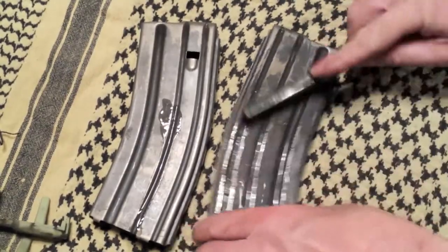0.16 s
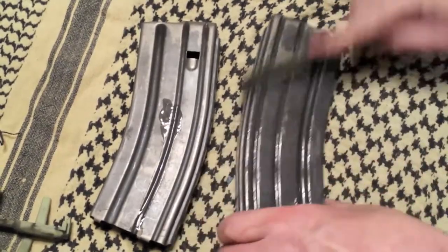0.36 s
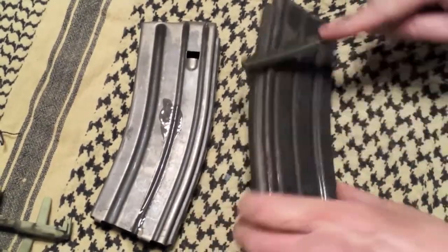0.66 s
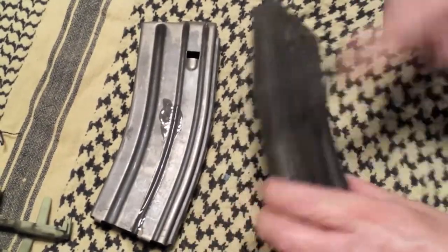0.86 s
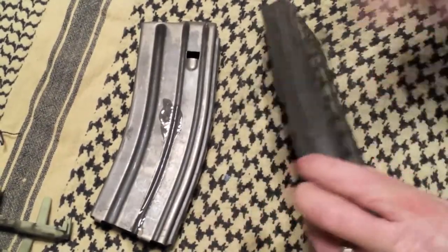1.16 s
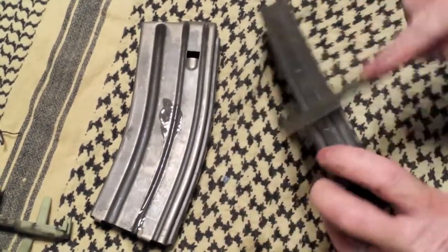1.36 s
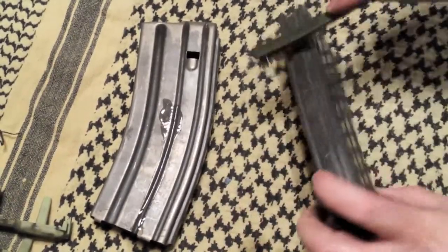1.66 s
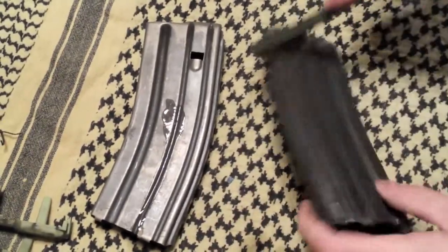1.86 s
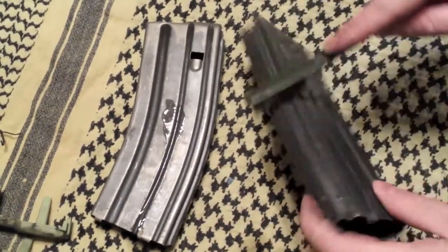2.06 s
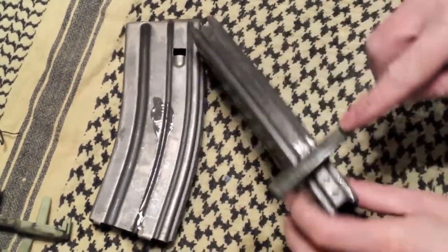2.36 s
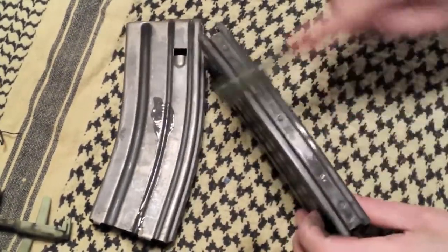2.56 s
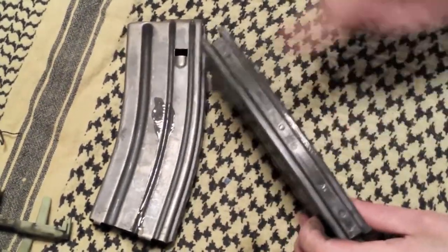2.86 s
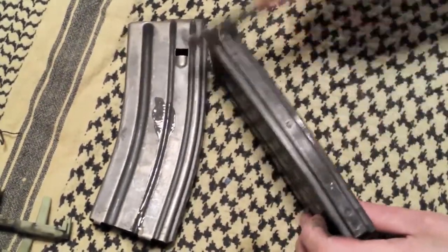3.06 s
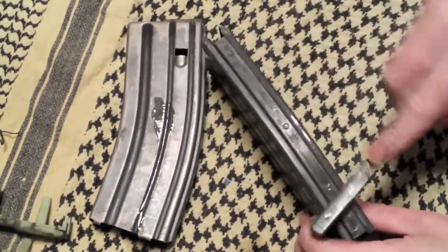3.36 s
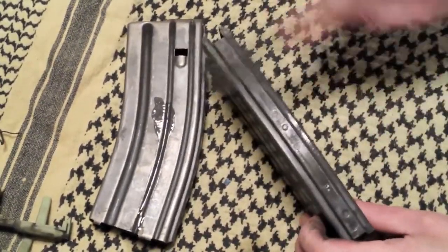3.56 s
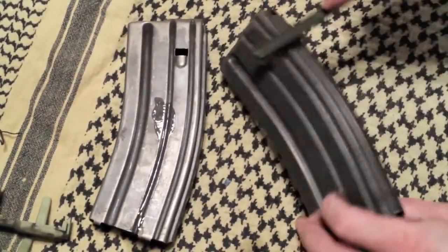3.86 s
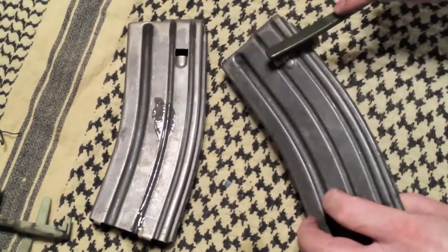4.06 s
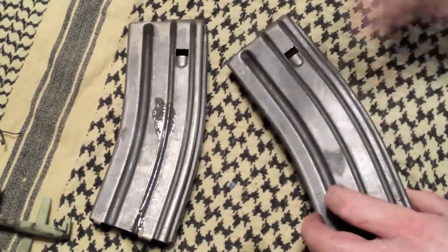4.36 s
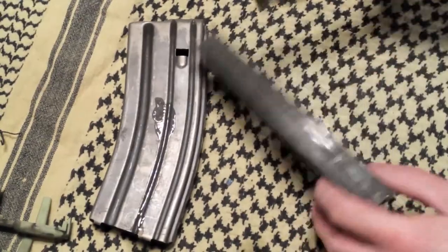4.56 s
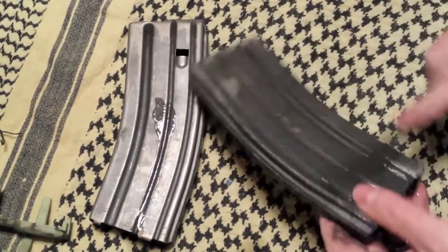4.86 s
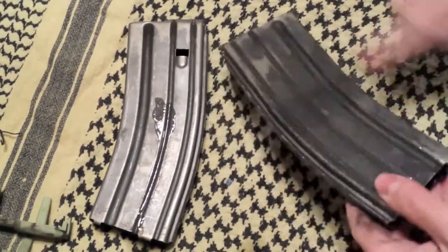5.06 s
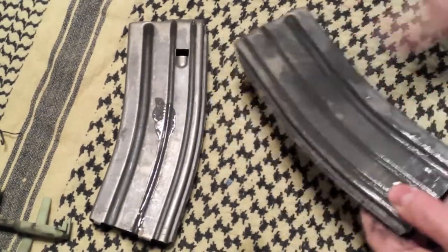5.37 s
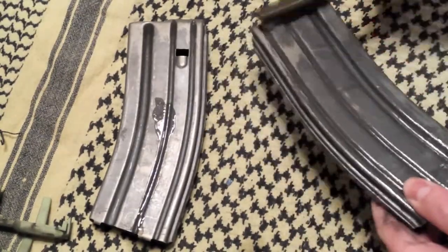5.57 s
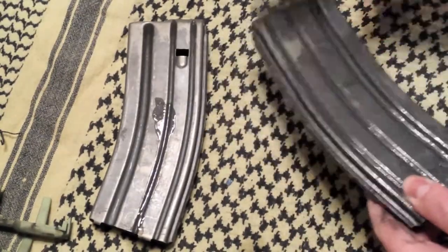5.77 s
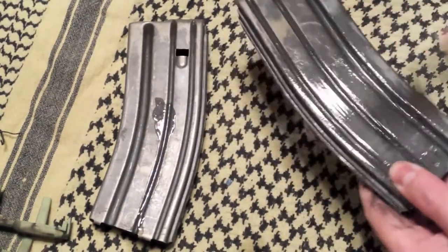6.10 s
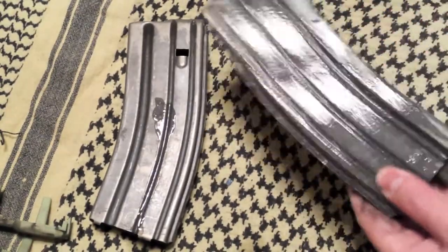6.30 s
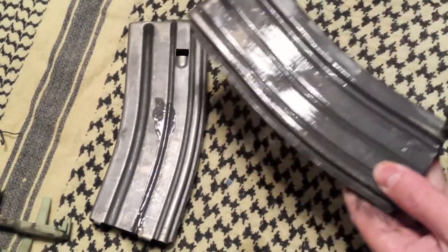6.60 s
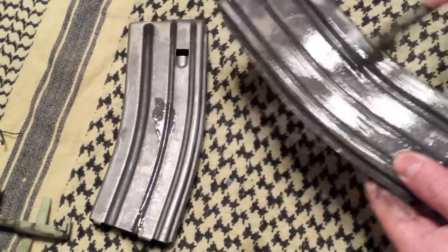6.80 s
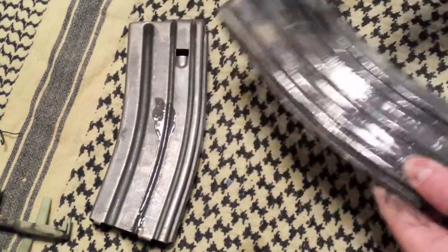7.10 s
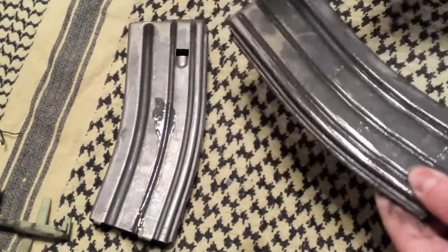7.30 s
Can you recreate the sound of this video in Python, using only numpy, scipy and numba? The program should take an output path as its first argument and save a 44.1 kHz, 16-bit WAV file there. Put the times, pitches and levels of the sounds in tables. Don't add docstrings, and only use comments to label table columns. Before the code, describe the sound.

Brisk bristle scrubbing hisses and rings on a small hollow metal case, punctuated by hard plastic clacks, close up in a small room.

```python
import sys
import numpy as np
from numba import njit
from scipy import signal
from scipy.fft import rfft, irfft
from scipy.io import wavfile
from scipy.ndimage import uniform_filter1d

SR = 44100
rng = np.random.default_rng(int(sys.argv[2]) if len(sys.argv) > 2 else 0)


def voltage_ratio(decibels):
    exponent = np.asarray(decibels, float) / 20
    return 10 ** exponent


def persist_wave(psi):
    counts = np.round(np.clip(psi, -1, 1) * 32767).astype(np.int16)
    wavfile.write(sys.argv[1], SR, np.atleast_2d(counts).T)


N = 328104

# (time [s], peak [dB], place [dB], hardness [dB])
KNOCKS = [(.093, -13.5, -12, -1.5), (.374, -12, 15, -17), (1.12, -24.5, 20, 3), (1.263, -17, 5, -2),
          (1.496, -29.5, 8, 13), (2.2285, 5.5, -13, -18), (2.315, -4.5, 10, -35), (3.153, -11, 10, -13),
          (3.938, -26, 23, -27), (4.185, -13, 7, -9), (4.253, -10, 20, -24), (4.321, -11, 7, -29),
          (4.639, -6.5, 0, -13), (4.682, -12.5, -18, -8), (4.709, -4.5, 3, -4.5), (4.785, -15.5, 0, 3),
          (4.821, -8.5, 21, -1), (4.844, 1, 3.5, -9.5), (5.046, -19, 5, -11), (5.336, -31.5, -5, -10),
          (6.288, -4, -3, -4.5), (6.329, -5, -1.5, -14), (6.3961, 0, -4.5, -5), (6.433, -7.5, 1, -35),
          (6.513, -31, -11, 0), (6.699, -33, 1, -9), (7.374, -19.5, 10, -23)]
# (frequency [Hz], time to fade by 60 dB [s], level [dB])
WIDE_PANEL = [(710, 0.041, -39), (801, 0.068, 5), (887, 0.073, -1.5), (974, 0.048, 5), (1047, 0.043, 0.5)]
# (frequency [Hz], time to fade by 60 dB [s], level [dB])
NARROW_PANEL = [(1296, 0.072, -2), (1290, 0.035, 4.5), (1428, 0.049, -3.5), (1652, 0.032, -2.5),
                (1778, 0.03, 3.5)]
# (time [s], narrow panel over wide panel [dB])
GRIP = [(0, -8.5), (.8, 4.5), (1.15, -27), (1.8, -14), (2.25, -6.5), (2.9, -1), (3.9, -8), (4.26, 3.5),
        (4.6, 0), (4.85, -8.5), (5.9, -4), (6.3, 1.5), (6.6, 5.5), (7.44, 1)]
# (frequency [Hz], time to fade by 60 dB [s], level [dB])
RIB_NOTES = [(1994, 0.038, -1.5), (2024, 0.081, -1.5), (2062, 0.057, -4), (2607, 0.029, -3),
             (2881, 0.067, 1.5), (3131, 0.031, 3), (3440, 0.045, 3), (4010, 0.074, -7), (4534, 0.033, -3),
             (4530, 0.04, -7), (5263, 0.029, 7.5)]
# (frequency [Hz], level per Hz [dB])
RIB_CROWD = [(880, -35), (1500, -14.5), (2040, -3), (2380, -8.5), (2890, 0.5), (3520, 1), (3930, 2.5),
             (4800, -7), (6240, -38), (10600, -120)]
# (frequency [Hz], level per Hz [dB])
HISS = [(4700, 7.5), (5200, 5.5), (5800, 5.5), (6600, 8), (7200, 5.5), (8100, 7), (8800, 5), (9900, -7.5),
        (11000, -7), (13000, -11), (15300, -16.5)]


def shell():
    hiss, mid, air, panel = strokes()
    s, peak_db, place_db, hard_db = np.transpose(KNOCKS)
    bounce_s = .0018
    panel_db = peak_db - 11.5 + np.minimum(place_db, 0)
    rib_db = peak_db - 5 - np.maximum(place_db, 0)
    tips = flicks(16000, spread_db=2.0, patchy_db=1.5)
    tufts = flicks(7000, spread_db=2.5, patchy_db=2.5)
    tick = blows(s, peak_db + hard_db + 0.5, .00002, 0.00043, rattle_db=4.0)
    bang = blows(s, panel_db + 12, .00008, bounce_s, rattle_db=-5.5)
    rib_hit = blows(s, rib_db + 9.0, .00004, bounce_s, rattle_db=-5.0)

    wide_push = tufts * panel * voltage_ratio(2.0) + bang
    sound = ring(wide_push, WIDE_PANEL, place_db=2.5, place_rate=7.7, turn_rad=0.34, count=1)
    narrow_push = (tufts * panel + voltage_ratio(1.0) * bang) * voltage_ratio(curve(GRIP)[0] - 2.5)
    sound += ring(narrow_push, NARROW_PANEL, place_db=7.5, place_rate=6.6, turn_rad=0.7, count=1)

    rib_push = tufts * mid * voltage_ratio(3.5) + rib_hit
    sound += ring(rib_push, RIB_NOTES, place_db=-1.0, place_rate=8, turn_rad=0.89, count=1)
    ribs = crowd(RIB_CROWD, 1550, 4700, .03, count=32)
    sound += voltage_ratio(-4) * ring(rib_push, ribs, place_db=5, place_rate=9, turn_rad=1.5, count=2)

    hiss_modes = crowd(HISS, 4750, 10600, .035, count=64)
    hiss_push = tips * hiss * voltage_ratio(1.5) + tick
    upper = ring(hiss_push, hiss_modes, place_db=7, place_rate=8, turn_rad=2.5, count=3)
    air_modes = crowd(HISS, 9500, 15300, .035, count=48)
    air_push = tips * air * voltage_ratio(-.5) + voltage_ratio(-12) * tick
    upper += ring(air_push, air_modes, place_db=6, place_rate=8, turn_rad=3, count=3)

    sound += signal.sosfilt(signal.butter(4, 4200, "high", fs=SR, output="sos"), upper)
    sound += cracks(s, peak_db - .4)
    return signal.sosfilt(signal.butter(3, 640, "high", fs=SR, output="sos"), sound)


# (time [s], length
# [s], hiss [dB], swell [dB], weight [dB])
STROKES = [(0.0, 0.052, -52, -25, 0), (.085, 0.08, -34.5, -4, 3.5), (0.211, 0.081, -34.5, -5, -0.5),
           (0.312, .04, -32.5, 10, 0), (0.365, 0.11, -26.5, -3.5, -2), (0.521, 0.13, -34, -4.5, -7.5),
           (0.68, .13, -36, -13.5, -9), (0.832, 0.11, -34, 0, -19.5), (0.964, 0.13, -34, -3, -14.5),
           (1.111, 0.13, -33.5, 2, -13.5), (1.255, 0.14, -33, -7, -9.5), (1.41, .12, -28, -0.5, -18.5),
           (1.569, .068, -28, -15.5, -8.5), (1.675, 0.19, -42, -30, -3), (1.802, 0.046, -37.5, 13, 0),
           (1.904, .19, -61, -32, -4.5), (2.112, 0.018, -35, -7.5, -13), (2.155, 0.037, -44, 0, -9),
           (2.233, 0.015, -21, -23, 12), (2.245, 0.1, -28, -3, 7), (2.376, 0.17, -48, 8, -21),
        (2.575, 0.14, -47.5, -19.5, -10.5), (2.7, .11, -42, -3.5, -35), (2.844, 0.13, -48, -25, -5.5),
        (2.949, .11, -42, 15.5, -12), (3.085, 0.15, -40, -10, -5.5), (3.234, .11, -47, 8, -12),
        (3.374, .15, -35.5, 9.5, -20), (3.56, 0.13, -36.5, -15, -11.5), (3.696, .12, -33, -7.5, -18.5),
        (3.84, 0.14, -52, -7, 19.5), (4, 0.1, -53, -3, 10), (4.149, 0.075, -29, 16, -0.5),
        (4.169, 0.11, -30.5, 19.5, 8), (4.308, .12, -34.5, 5.5, -6), (4.448, .17, -56, -22, -9),
           (4.64, 0.037, -29.5, -14, 13.5), (4.711, 0.034, -34, -2, 13), (4.783, .11, -28, 12.5, 2.5),
        (4.906, 0.12, -33.5, -14.5, -9.5), (5.038, 0.12, -33.5, 0, 0.5), (5.175, 0.14, -39.5, -19.5, -3),
        (5.329, 0.1, -30.5, 7.5, -3.5), (5.46, 0.11, -40.5, -9, -10), (5.601, 0.1, -27, 1, -1.5),
        (5.724, 0.099, -35, -5.5, -9), (5.842, .16, -23, -1.5, -3), (5.976, 0.18, -38.5, 3.5, -4),
        (6.19, 0.08, -26, -4, -12.5), (6.246, 0.064, -21.5, -9.5, -1), (6.393, 0.062, -36, -9, 0),
        (6.503, 0.062, -58, -25, 4), (6.694, 0.14, -44.5, -5, -10.5), (6.862, 0.085, -38, -0.5, -9.5),
        (6.966, .1, -38, 0, -18), (7.108, 0.08, -31.5, 1, -7), (7.203, 0.45, -40, 4.5, -8.5),
        (7.364, 0.048, -20.5, 2, -12)]


def strokes():
    power = np.zeros((4, N))
    for s, length, db, swell_db, weight_db in STROKES:
        start = max(int((s - .03) * SR), 0)
        stop = min(int((s + length + .04) * SR), N)
        t = np.arange(start, stop) / SR - s
        struck = np.min(np.abs(np.array(KNOCKS)[:, 0] - s)) < .009
        rise = np.tanh(t / 0.0034) if struck else np.tanh(t / 0.047 + 0.29)
        fall = np.tanh((length - t) / 0.046 + 0.26)
        speed = np.maximum(rise, 0) * np.maximum(fall, 0)
        along = t / length - .5
        rib_db = -0.5 + 0.32 * weight_db
        air_db = min(-8 - 0.4 * weight_db, -3)
        panel_db = weight_db - 4.5 * along
        shares = voltage_ratio([0 * t, rib_db + 0 * t, air_db + 0 * t, panel_db])
        power[:, start:stop] += (speed * voltage_ratio(db + swell_db * along) * shares) ** 2
    return np.sqrt(power)


def flicks(rate, spread_db, patchy_db):
    size = voltage_ratio(spread_db * rng.exponential(size=N)) * rng.choice([-1., 1.], N)
    clumps = np.repeat(voltage_ratio(patchy_db * walks(90, count=1)[0]), 64)[:N]
    slips = rng.random(N) < rate / SR
    return unit(size * clumps * slips)


def blows(times, db, push_s, rattle_s, rattle_db):
    force = np.zeros(N)
    force[(np.asarray(times) * SR).astype(int)] = voltage_ratio(db)
    push = signal.lfilter([1 / np.sqrt(push_s * SR / 2)], [1, -np.exp(-1 / (push_s * SR))], force)
    dying = signal.lfilter([1], [1, -np.exp(-1 / (rattle_s * SR))], force)
    return push + voltage_ratio(rattle_db) * dying * rng.standard_normal(N)


def cracks(times, db):
    snap = blows(times, db, .00003, .0016, rattle_db=4)
    snap = signal.sosfilt(signal.butter(1, [1000, 5000], "band", fs=SR, output="sos"), snap)
    left = signal.lfilter([0, 0, 0, .3, .45, .3], [1], snap)
    return np.array([left, snap])


def crowd(colour, low_hz, top_hz, t60_s, count):
    shift, stretch, scatter = rng.standard_normal((count, 3)).T
    hz = np.linspace(low_hz, top_hz, count) + 30 * shift
    return np.transpose([hz, t60_s * np.exp(0.14 * stretch), shape(hz, colour) + 1.5 * scatter])


# (frequency [Hz], left over right [dB])
SHADE = [(300, -.5), (700, 2), (1300, -1), (2400, 3), (4400, 0), (6000, -4), (8100, -16), (15000, -15)]


def ring(force, modes, place_db, place_rate, turn_rad, count):
    hz, t60, db = np.transpose(modes)[:, :, None]
    decay = np.log(1000) / (np.maximum(t60, .004) * SR)
    pole = np.exp(2j * np.pi * hz / SR - decay)[:, 0]
    place = uniform_filter1d(walks(place_rate, count=len(hz)), count, axis=0) * np.sqrt(count)
    drive = voltage_ratio(db + place_db * np.tanh(place)) * np.sqrt(decay)
    drive = drive * rng.choice([-1, 1], hz.shape)
    turn = turn_rad * walks(5.8, count=len(hz))[:, :1 + N // 64]
    lead = turn - 2 * np.pi * hz * 1e-4
    shade_db = shape(hz, SHADE)
    left = voltage_ratio(shade_db / 2)
    right = voltage_ratio(-shade_db / 2) * np.ones_like(lead)
    ports = np.transpose([left * np.sin(lead), left * np.cos(lead), right], (2, 0, 1))
    loud = np.sqrt(np.sum(voltage_ratio(db) ** 2) / 4)
    return resonate(force, pole, np.ascontiguousarray(drive.T), np.ascontiguousarray(ports)) / loud


@njit(fastmath=True)
def resonate(force, pole, drive, ports):
    out = np.zeros((2, len(force)))
    re, im = np.zeros(len(pole)), np.zeros(len(pole))
    c, s = pole.real.copy(), pole.imag.copy()
    for i in range(len(force)):
        d, p = drive[i >> 6], ports[i >> 6]
        left, right = 0., 0.
        for m in range(len(pole)):
            turned = re[m] * c[m] - im[m] * s[m] + force[i] * d[m] + 1e-18
            im[m] = re[m] * s[m] + im[m] * c[m]
            re[m] = turned
            left += re[m] * p[0, m] + im[m] * p[1, m]
            right += im[m] * p[2, m]
        out[0, i] = left
        out[1, i] = right
    return out


def walks(rate, count):
    k = max(int(SR / 64 / rate), 1)
    steps = np.repeat(rng.standard_normal((count, N // 64 // k + 3)), k, axis=1)
    smooth = uniform_filter1d(steps, k, axis=1)
    return 1.4 * uniform_filter1d(smooth, k, axis=1)


def unit(x):
    return x / np.sqrt(np.mean(x ** 2))


def curve(points):
    s, *columns = np.transpose(points)
    return [np.interp(np.arange(N) / SR, s, c) for c in columns]


def shape(hz, points):
    f, db = np.transpose(points)
    return np.interp(np.log(np.maximum(hz, 1)), np.log(f), db)


# (frequency [Hz], time to fade by 60 dB [s], level [dB])
TABLE_NOTES = [(283, .17, 0), (534, .11, -3), (400, .06, -8), (660, .05, -7)]
# (time [s], level [dB])
LANDINGS = [
    (2.3135, -22),
]


def table_thud():
    s, db = np.transpose(LANDINGS)
    push = blows(s, db + 22, .0002, .003, rattle_db=-15)
    thud = ring(push, TABLE_NOTES, place_db=0, place_rate=5, turn_rad=0, count=1)
    return signal.sosfilt(signal.butter(2, 190, "high", fs=SR, output="sos"), thud)


def walls(x):
    t60_s, level_db = 0.24, -12.5
    t = np.arange(SR // 3) / SR
    noise = rng.standard_normal((2, len(t)))
    dull = uniform_filter1d(noise, size=5, axis=1) * voltage_ratio(-60 * t / t60_s)
    tail = dull + .5 * noise * voltage_ratio(-60 * t / (1.87 * t60_s))
    tail *= np.minimum(t / 0.011, 1) / np.sqrt(np.sum(tail ** 2) / 2)
    return voltage_ratio(level_db) * signal.oaconvolve(x, tail, axes=1)[:, :N]


# (frequency [Hz], width [Hz], level [dB])
DUCT = [(71.4, 11, -7), (98.9, 8.9, 0.5), (136.5, 5.7, 6), (190.6, 7.8, 2), (236.6, 17, -2.5),
        (294, 128, -10.5)]
# (frequency [Hz], level per Hz [dB])
HUSH = [(15, -73), (25, 1), (87, -56), (270, -16), (560, -12.5), (936, -22.5), (1740, -30), (2110, -63),
        (3820, -24), (4370, -23), (4870, -31), (5730, -27.5), (16000, -42)]
# (time [s], rumble level [dB])
RUMBLE = [(0.0, -37.5), (1.86, -37), (1.97, -37.5), (2.59, -50), (2.88, -48), (3.87, -35.5), (4.6, -38.5),
          (4.76, -40), (5.41, -48), (6.09, -38), (6.4, -39.5), (6.76, -45.5), (7.04, -46.5), (7.44, -39.5)]


def ventilation():
    hz = np.arange(N // 2 + 1) * SR / N
    peaks = sum(voltage_ratio(db) ** 2 / (1 + (2 * (hz - f) / w) ** 2) for f, w, db in DUCT)
    hush = voltage_ratio(-14 + shape(hz, HUSH))
    gain = np.sqrt(peaks * np.minimum(hz / 60, 1) ** 4 + hush ** 2)
    mid, side = rfft(rng.standard_normal((2, N)), axis=1) * gain
    side = side * np.clip(hz / 1300, .09, 1)
    air = irfft(np.array([mid + side, mid - side]), N, axis=1)
    return unit(air) * voltage_ratio(curve(RUMBLE)[0] + 2.0)


# (frequency [Hz], width [Hz])
NOTCHES = [(2420, 130), (3300, 160), (3480, 200), (3640, 300)]


def scene():
    near = shell() + table_thud()
    sound = near + walls(near) + ventilation()
    for hz, width in NOTCHES:
        sound = signal.lfilter(*signal.iirnotch(hz, hz / width, SR), sound)
    return sound


def roll_off(x):
    return signal.sosfilt(signal.butter(12, 16440, fs=SR, output="sos"), x)


def record(dry):
    top = signal.ellip(10, .3, 60, 15600, fs=SR, output="sos")
    mix = signal.sosfilt(top, np.clip(dry, -1, 1))
    return roll_off(np.clip(mix, -.97, .97))


dry = scene()
out = record(dry)
persist_wave(out)
```